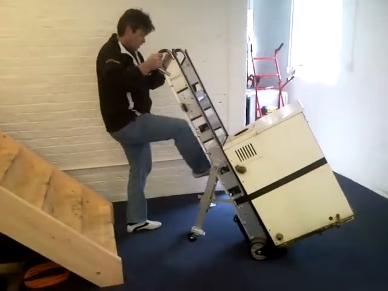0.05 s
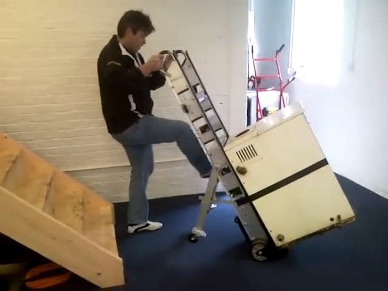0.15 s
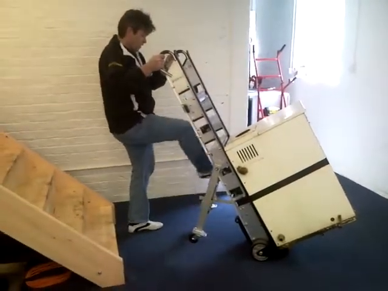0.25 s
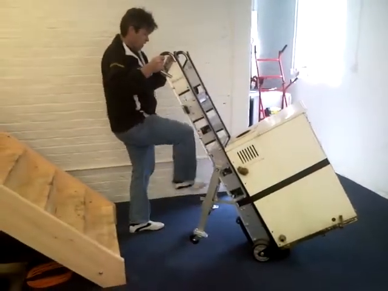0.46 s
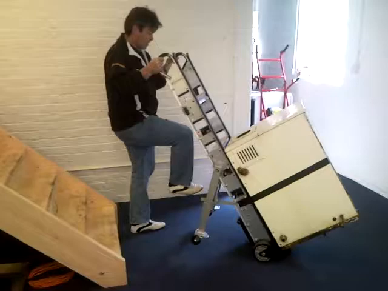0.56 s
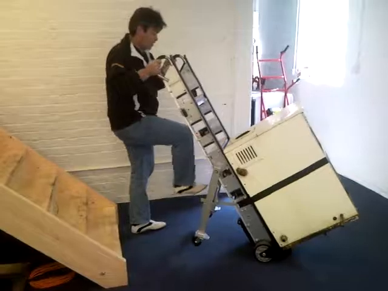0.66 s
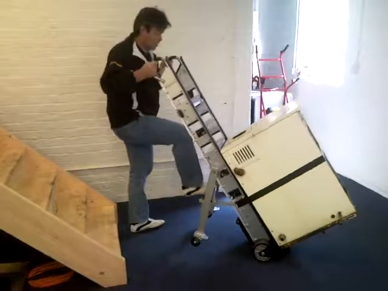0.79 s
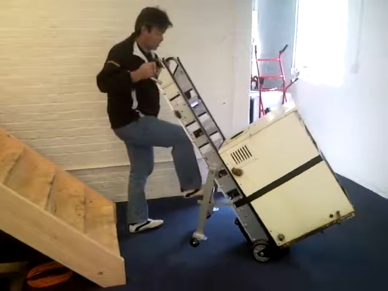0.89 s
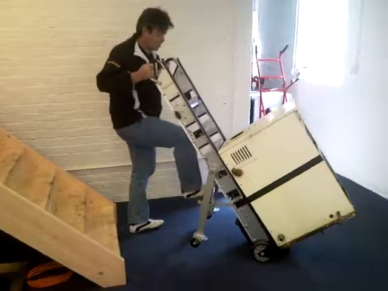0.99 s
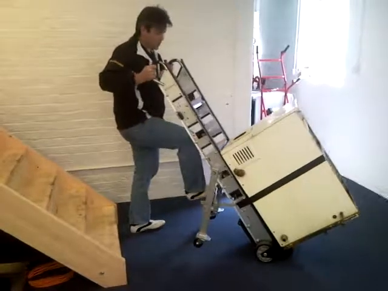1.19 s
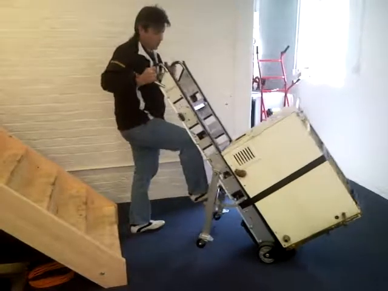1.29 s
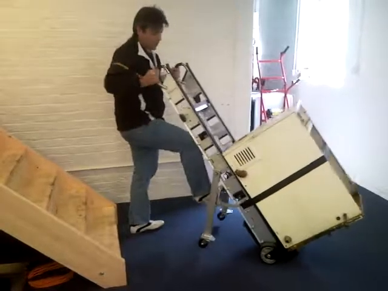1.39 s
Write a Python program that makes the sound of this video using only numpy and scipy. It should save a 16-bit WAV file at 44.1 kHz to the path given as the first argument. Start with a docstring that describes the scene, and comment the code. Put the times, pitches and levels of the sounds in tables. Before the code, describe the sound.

A sharp metal snap on a loaded hand truck rings, then a soft loose clunk follows

```python
"""A faint dry creak, then one hard metallic clack that rings in a bare brick room; later a soft, loose clunk
and a little rolling on carpet with a thin scrape, over low thumps, room rumble and hiss.
A loaded aluminium hand truck is tipped back, its support leg snaps home and the load settles.
Blows are short noise cracks, decaying modes and dense room washes; rolling, scrape and air are shaped noise.
A small microphone rounds the loudest peaks and dulls the top."""
import sys
import numpy as np
from scipy import signal
from scipy.fft import rfft, irfft
from scipy.io import wavfile
from scipy.ndimage import uniform_filter1d

SR = 44100
rng = np.random.default_rng(int(sys.argv[2]) if len(sys.argv) > 2 else 0)


def transcribe(u):
    """Save the signal u as a 16-bit wav file named by the first command-line argument.

    u: samples, shape (n,) or (channels, n), limited to [-1, 1]; the rate is SR.
    q: integer samples, one column per channel.
    """
    v = np.clip(np.atleast_2d(u).T, -1, 1)
    q = np.round(v * 32767).astype(np.int16)
    wavfile.write(sys.argv[1], SR, q)


N = 63945  # length in samples

# Background air of the room. Each row: frequency in Hz, relative spectrum level in dB.
AIR_COLOUR = [(25, -21.5), (48, 0.5), (65, -1), (110, -3.5), (160, -12.5), (230, -7), (310, -14.5),
              (420, -10.5), (560, -21), (1200, -21.5), (2300, -19.5), (3200, -29), (7000, -32.5),
              (8000, -54)]
# Rolling of the wheels over time. Each row: time in seconds, level in dB.
ROLL_LEVEL = [(0.8, -91), (0.9, -55), (1.08, -55), (1.22, -54.5), (1.32, -57.5), (1.45, -66.5)]
# Tone of tyres on carpet. Each row: frequency in Hz, relative spectrum level in dB.
TYRE_COLOUR = [(150, -11), (550, -5), (850, -1), (1350, 0), (1900, -10.5), (3000, -13.5), (7000, -21.5),
               (8000, -42)]
# Thin scrape of sliding metal over time. Each row: time in seconds, level in dB.
SCRAPE_LEVEL = [(0.78, -81.5), (0.88, -62.5), (1.05, -72), (1.33, -66.5), (1.45, -68)]
# Creak of the frame as it takes the strain. Each row: frequency in Hz, relative spectrum level in dB.
CREAK_COLOUR = [(150, -15), (230, 0), (330, -8), (600, -22), (1050, -20), (1310, -9), (1700, -25),
                (2430, -14), (3200, -28), (8000, -50)]
# Soft thumps of the load rocking on the floor. Each row: start in seconds, pitch in Hz, level in dB.
THUMPS = [(0.0, 108.9, -50), (0.125, 114.3, -45.5), (0.361, 73.9, -41.5), (0.46, 73, -44),
          (0.881, 87.4, -43.5), (1.031, 82.9, -48), (1.184, 64.4, -42), (1.26, 107.7, -41.5)]
# Loose contacts of the settling load. Each row: start in seconds, level in dB applied to modes and wash.
CLUNKS = [(0.904, -10.5), (0.9155, -7.5), (0.9203, 1.5), (0.953, -6.5), (1.009, -14)]
# Modes of the loaded truck. Each row: frequency in Hz, level in dB before the contact's own, t60 in seconds.
LOAD_MODES = [(86.7, -43, 0.81), (219, -54.5, 0.65), (420, -85, 0.49), (753, -44, 0.59), (786, -48.5, 0.39),
              (2218, -43.5, 0.35), (2422, -29, 0.027)]
# Dense wash of each clunk. Each row: frequency in Hz, relative spectrum level in dB.
CLUNK_COLOUR = [(30, -42), (60, -21), (86, -9), (142, -13.5), (234, -7), (350, -12.5), (410, -6),
                (540, -19.5), (774, -14), (935, -36), (1550, -11), (1900, -16.5), (2350, -9.5), (2900, -15),
                (3700, -15), (4300, -21), (4800, -32.5), (7200, -28), (8000, -49), (9500, -70)]
# Leg latch: a light touch, the snap, two rebounds. Each row: start in seconds, relative crack level in dB.
SNAPS = [(0.2012, -22.5), (0.2062, -2), (0.2106, 0), (0.2154, 0.5)]
# Crack of each latch contact. Each row: frequency in Hz, relative spectrum level in dB.
CRACK_COLOUR = [(200, -34.5), (1500, -8), (2300, 2), (3400, -10), (5200, -15), (6700, -4), (7800, -14),
                (9000, -41.5)]
# Modes of the latch and frame. Each row: frequency in Hz, level in dB, t60 in seconds.
FRAME_MODES = [(1040, -30, .45), (1073, -29, .6), (1510, -31, .3), (2075, -9, .13), (2120, -20, .55),
               (2140, -24, .6), (2224, -19.5, .62), (2311, -21, .36), (2340, -23, .62), (2481, -26, .55),
               (2525, -27, .5), (2616, -13, .2), (2644, -14, .18), (2734, -23, .48), (3962, -34, .54),
               (4643, -27, .35), (4834, -36, .43), (6390, -21, .2), (6634, -23, .32), (6666, -26, .34),
               (6958, -25, .34), (7117, -26, .34)]
# Hollow panel modes of the load. Each row: frequency in Hz, level in dB, t60 in seconds.
PANEL_MODES = [(383.2, -12.5, 0.26), (411.3, -31.5, .7), (312.7, -30.5, .5), (241, -39.5, 0.62)]
# Dense ring of the frame in the room. Each row: frequency in Hz, relative spectrum level in dB.
CLANG_COLOUR = [(30, -43), (60, -18.5), (100, -17), (140, -19), (280, -21), (400, -14), (500, -22.5),
                (790, -15.5), (900, -13.5), (1040, -7.5), (1310, -16), (1550, -10), (1900, -9), (2150, 0),
                (2650, -5.5), (2850, -9.5), (3430, -12.5), (4700, -12), (5110, -19), (6000, -9.5),
                (6700, -3.5), (7600, -17), (8000, -38.5), (8400, -24.5), (9000, -42), (9600, -69.5)]
# Decay of the room. Each row: frequency in Hz, t60 in seconds before a wash's own decay factor.
ROOM_T60 = [(80, 1.0), (350, 0.95), (1000, 0.76), (2250, 0.61), (3200, 0.61), (5000, .49), (7000, 0.45),
            (9000, 0.31)]

AIR_DB = -56
SCRAPE_HZ, SCRAPE_WIDTH_HZ = 4130, 300
CREAK_START_S, CREAK_DB = .088, -52
THUMP_RISE_S, THUMP_T60_S = 0.019, 0.64
CLUNK_WASH_DB, CLUNK_BUILD_S, CLUNK_DECAY_FACTOR = -42.5, 0.0016, 0.86
CRACK_DB, CRACK_RISE_S, CRACK_T60_S = -12.5, 0.00033, .03
PANEL_BUILD_S = 0.11
CLANG_DB, CLANG_BUILD_S = -14.5, 0.0027
MODE_SPACING_HZ, MODE_SPREAD_DB = 9, 7  # unevenness of a wash, at most this far up or down before scaling
MIC_HZ, TOP_HZ = 9200, 15900  # low-pass corners before and after the clipping
OVERLOAD, CLIP = 0.88, 0.77  # soft and hard ceilings, in full-scale amplitude


def undb(db):
    """Decibels to gain."""
    return 10 ** (np.asarray(db) / 20)


def along(hz, points):
    """Read (Hz, value) points on a log-frequency axis."""
    f, v = np.array(points, float).T
    return np.interp(np.log(np.maximum(hz, 1)), np.log(f), v)


def noise(colour):
    """Random-phase noise of rms 1 with the given colour."""
    hz = np.arange(N // 2 + 1) * SR / N
    phase = np.exp(2j * np.pi * rng.random(len(hz)))
    x = irfft(phase * undb(along(hz, colour)), N)
    return x / x.std()


def fade(start, rise, t60):
    """Envelope of a blow: exponential rise and decay, silent before the start."""
    age = np.maximum(np.arange(N) / SR - start, 0)
    return (1 - np.exp(-age / rise)) * np.exp(-np.log(1000) * age / t60)


def curve(points):
    """Gain from (s, dB) points."""
    return undb(np.interp(np.arange(N) / SR, *np.array(points).T))


def ring(start, modes, rise, waver):
    """Decaying modes whose strength and phase waver as reflections mix in."""
    age = np.arange(N) / SR - start
    knots = np.linspace(0, N / SR, num=48)
    mixing = waver * (1 - np.exp(-np.maximum(age, 0) / 0.024))
    out = 0
    for hz, db, t60 in modes:
        drift = rng.standard_normal(len(knots)) + 1j * rng.standard_normal(len(knots))
        echo = np.interp(age, knots, drift)
        tone = np.imag((1 + mixing * echo) * np.exp(2j * np.pi * hz * age))
        out = out + undb(db) * fade(start, rise, t60) * tone
    return out


def wash(start, colour, rise, decay=1):
    """Countless modes of uneven strength, each band dying at the room's rate times the decay factor."""
    hz = np.arange(N // 2 + 1) * SR / N
    chance = rng.standard_normal(len(hz))
    bumps = np.interp(hz / MODE_SPACING_HZ, np.arange(len(hz)), chance)
    uneven = undb(MODE_SPREAD_DB * np.tanh(bumps))
    spectrum = rfft(noise(colour)) * uneven / np.sqrt(np.mean(uneven ** 2))
    centres = [f for f, _ in ROOM_T60]
    out = 0
    # Neighbouring bands crossfade: each has weight 1 at its own centre and 0 at the others.
    for share, (_, t60) in zip(np.eye(len(centres)), ROOM_T60):
        weight = along(hz, list(zip(centres, share)))
        out = out + irfft(spectrum * weight, N) * fade(start, rise, t60 * decay)
    return out


def air():
    """Steady low room rumble and hiss, as coloured noise."""
    return undb(AIR_DB) * noise(AIR_COLOUR)


def wheels():
    """Tyres rolling on carpet as noise that swells and fades."""
    return noise(TYRE_COLOUR) * curve(ROLL_LEVEL)


def metal_scrape():
    """Thin sliding metal: noise through one narrow resonance."""
    b, a = signal.iirpeak(SCRAPE_HZ, SCRAPE_HZ / SCRAPE_WIDTH_HZ, fs=SR)
    scrape = signal.lfilter(b, a, noise(TYRE_COLOUR))
    return scrape / scrape.std() * curve(SCRAPE_LEVEL)


def creak():
    """The frame takes the strain: a faint, dry wash of modes."""
    return undb(CREAK_DB) * wash(CREAK_START_S, CREAK_COLOUR, rise=.005)


def thumps():
    """The load rocks on the floor: one soft low mode per thump."""
    out = 0
    for start, hz, db in THUMPS:
        out = out + ring(start, [(hz, db, THUMP_T60_S)], rise=THUMP_RISE_S, waver=.25)
    return out


def load_clunks():
    """The load settles in loose contacts, each exciting the truck's modes and a dense wash."""
    out = 0
    for start, db in CLUNKS:
        body = ring(start, LOAD_MODES, rise=.0008, waver=0.23)
        tail = wash(start, CLUNK_COLOUR, CLUNK_BUILD_S, CLUNK_DECAY_FACTOR)
        out = out + undb(db) * (body + undb(CLUNK_WASH_DB) * tail)
    return out


def latch():
    """Every contact cracks; the snap also sets the frame, the load's panels and the room ringing."""
    cracks = 0
    for start, db in SNAPS:
        burst = noise(CRACK_COLOUR) * fade(start, CRACK_RISE_S, CRACK_T60_S)
        cracks = cracks + undb(db + CRACK_DB) * burst
    snap, _ = SNAPS[1]  # the second contact, after the light touch
    frame = ring(snap, FRAME_MODES, rise=.0018, waver=.35)
    panels = ring(snap, PANEL_MODES, rise=PANEL_BUILD_S, waver=0.058)
    clang = undb(CLANG_DB) * wash(snap, CLANG_COLOUR, CLANG_BUILD_S)
    return cracks + frame + panels + clang


def scene():
    """Truck and room, in mono."""
    truck = wheels() + metal_scrape() + creak() + thumps() + load_clunks() + latch()
    return (air() + truck)[None]


def record(dry):
    """The microphone rounds the peaks and loses its top treble; what still passes the ceiling clips."""
    rounded = dry / (1 + (dry / OVERLOAD) ** 4) ** (1 / 4)
    mic_lowpass = signal.cheby1(8, .1, MIC_HZ, fs=SR, output="sos")
    narrow = signal.sosfiltfilt(mic_lowpass, rounded)
    clipped = np.clip(narrow, -CLIP, CLIP)
    top_lowpass = signal.ellip(8, .2, 70, TOP_HZ, fs=SR, output="sos")
    return signal.sosfilt(top_lowpass, clipped)


dry = scene()
out = record(dry)
transcribe(out)
```